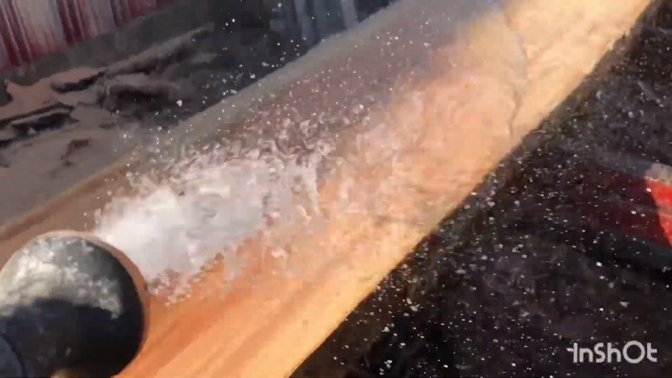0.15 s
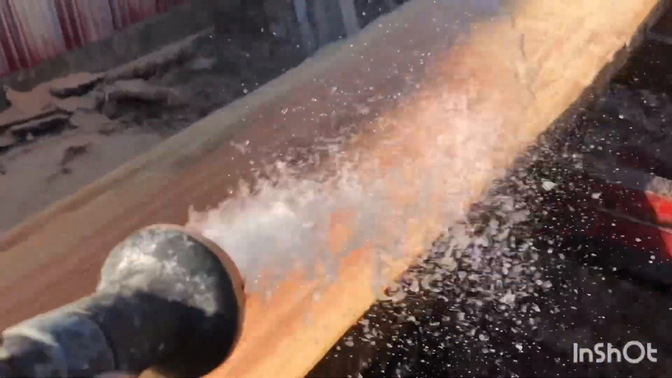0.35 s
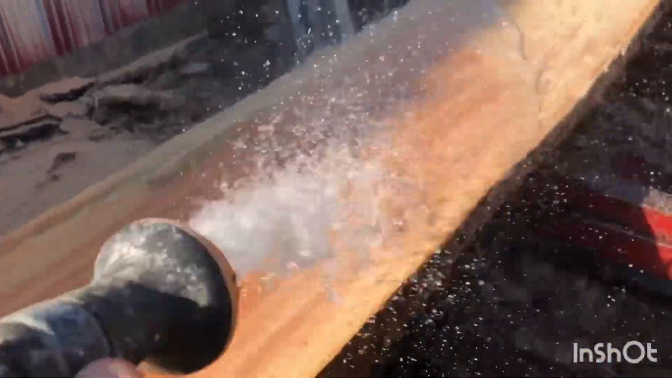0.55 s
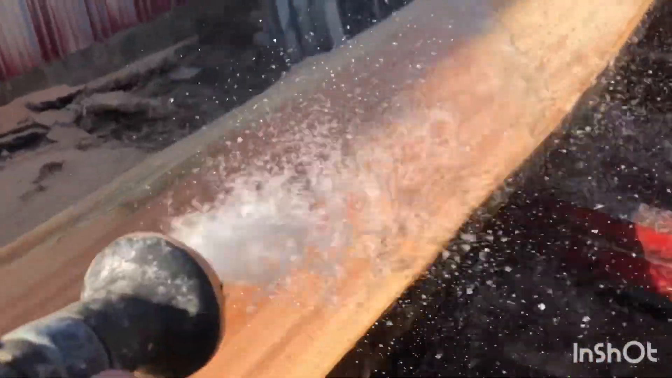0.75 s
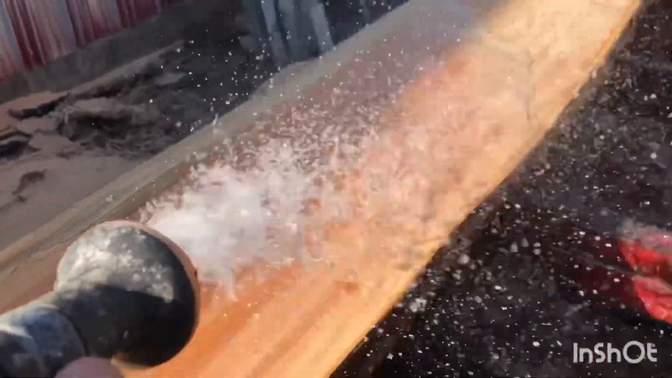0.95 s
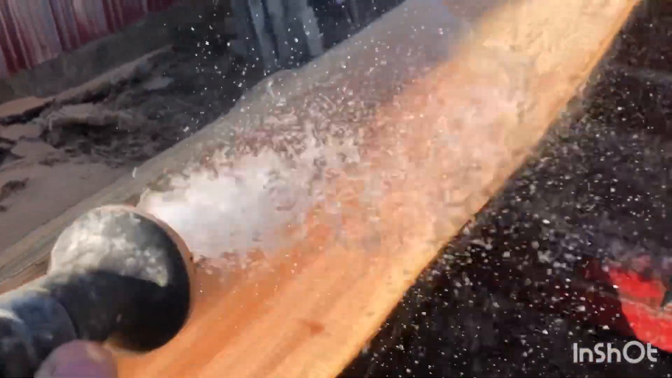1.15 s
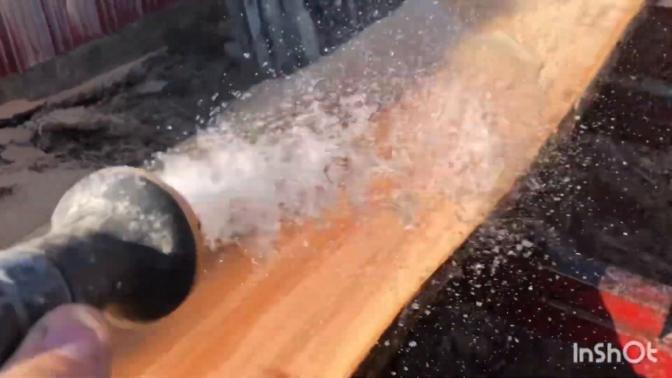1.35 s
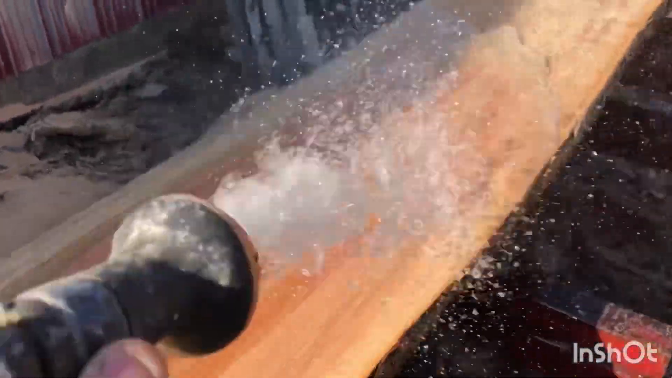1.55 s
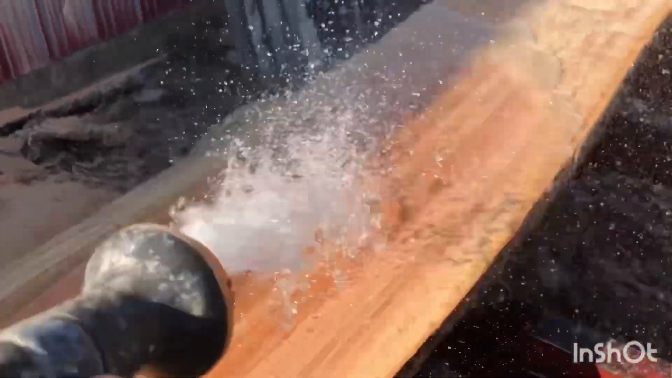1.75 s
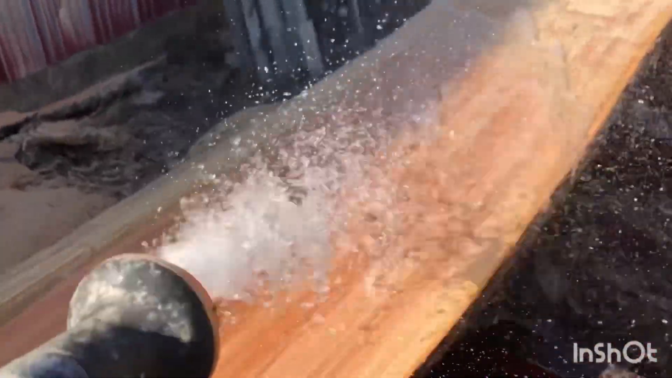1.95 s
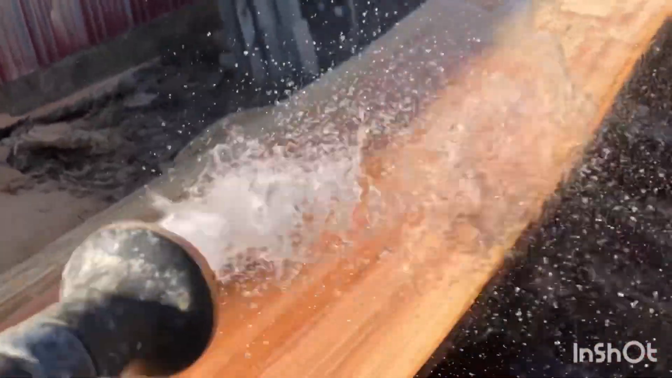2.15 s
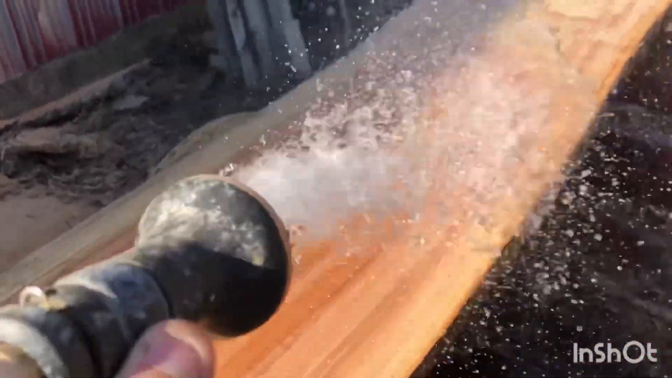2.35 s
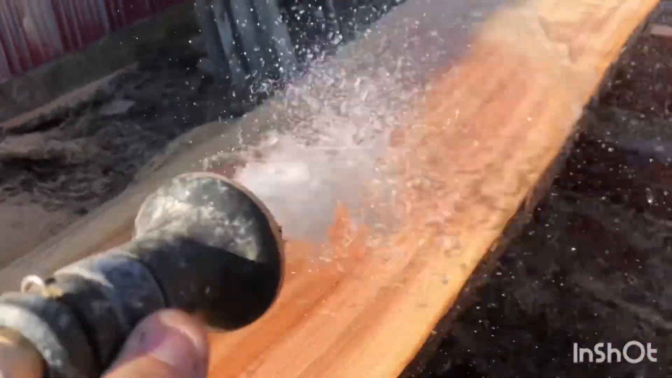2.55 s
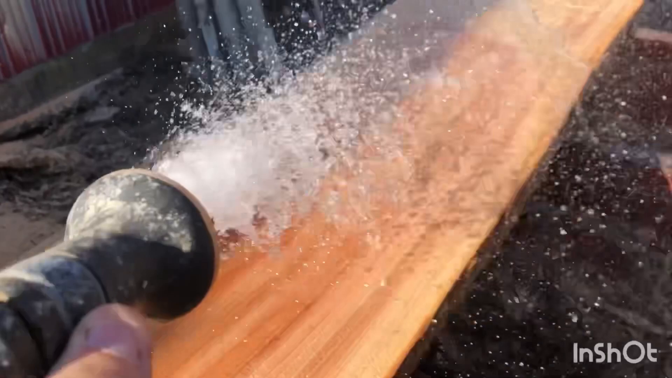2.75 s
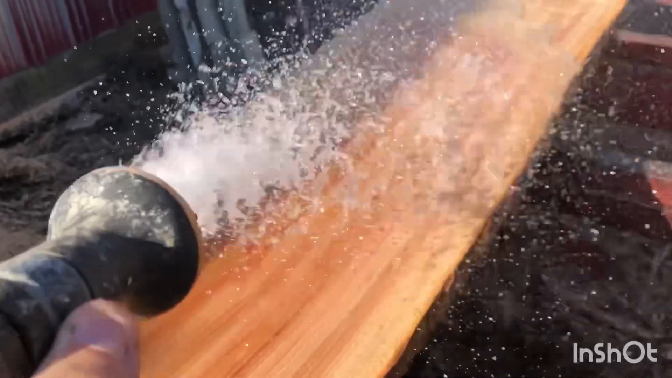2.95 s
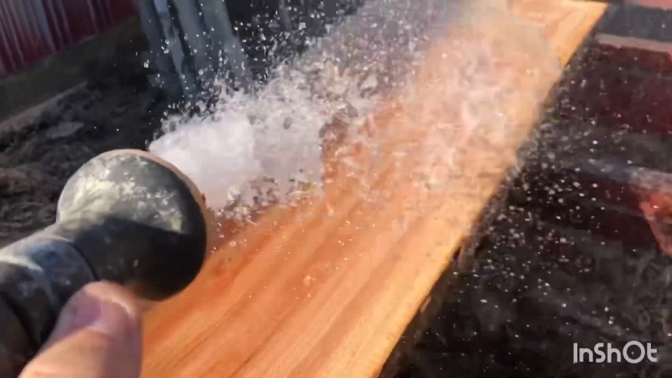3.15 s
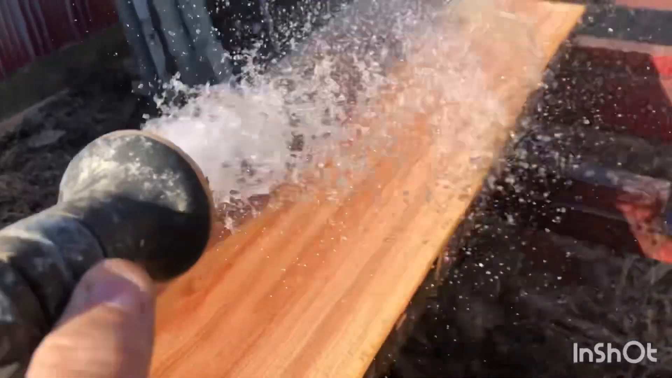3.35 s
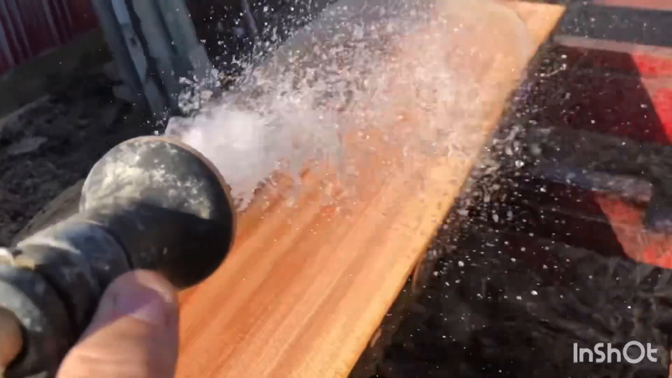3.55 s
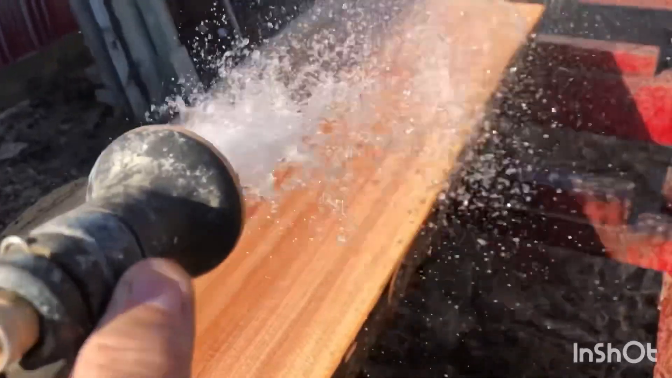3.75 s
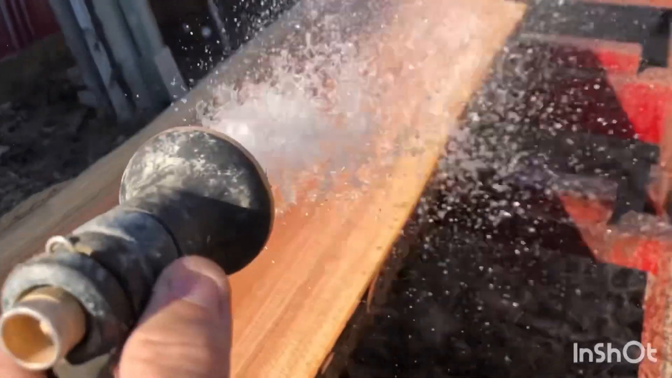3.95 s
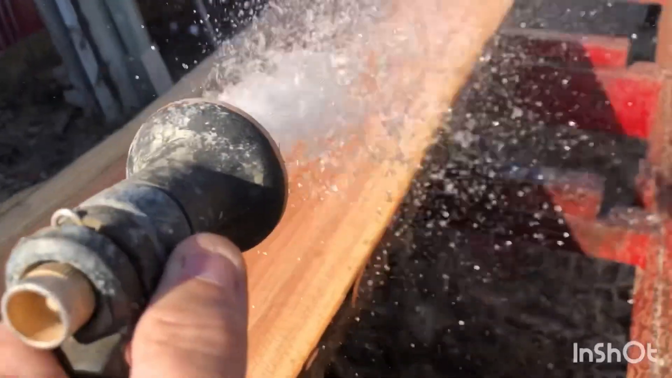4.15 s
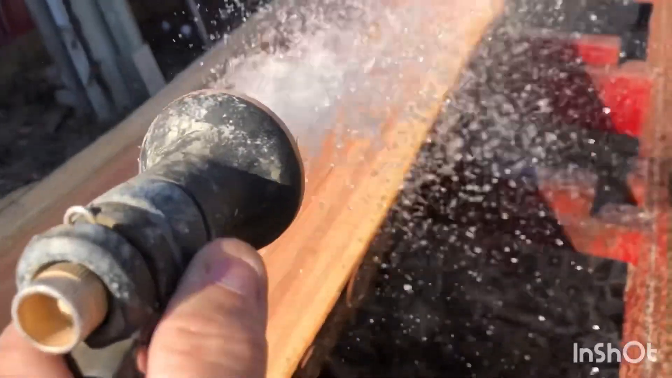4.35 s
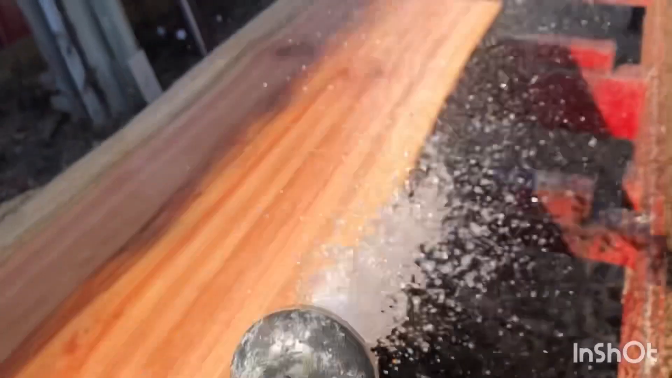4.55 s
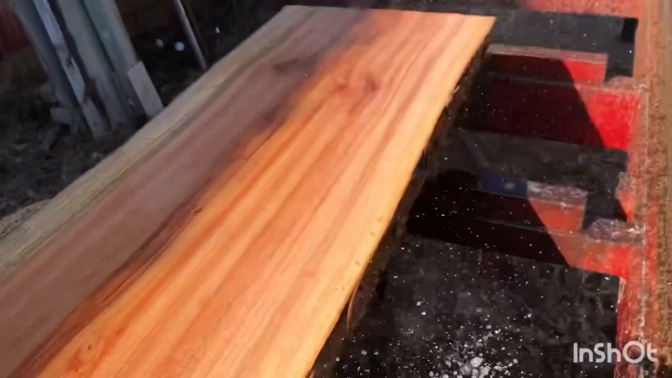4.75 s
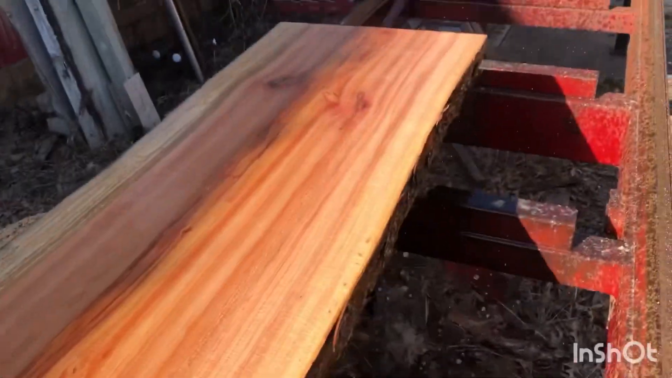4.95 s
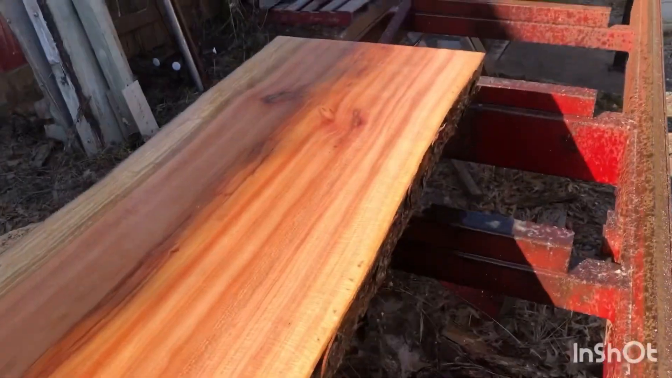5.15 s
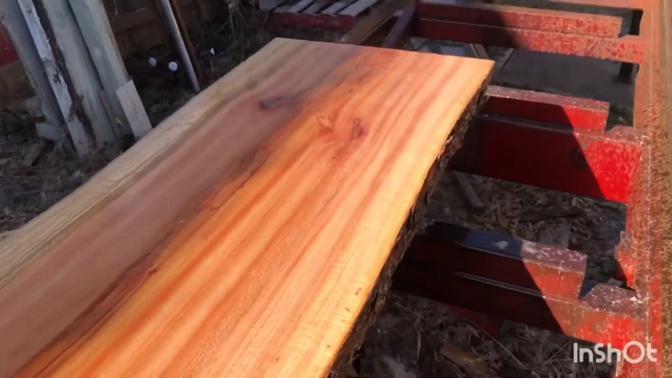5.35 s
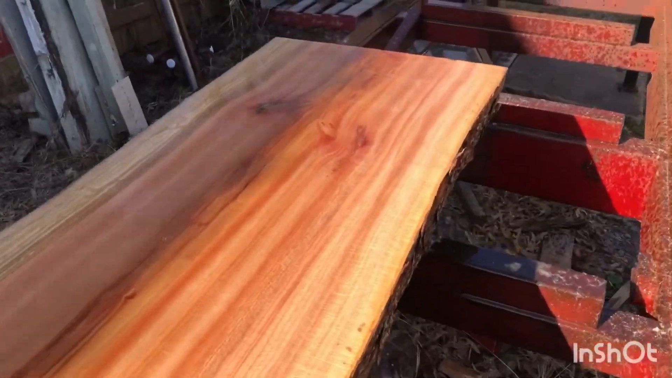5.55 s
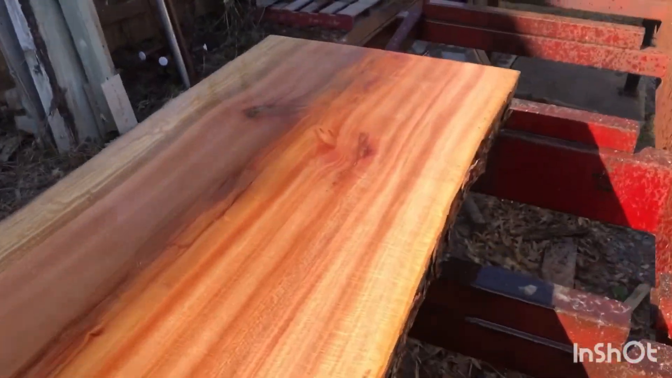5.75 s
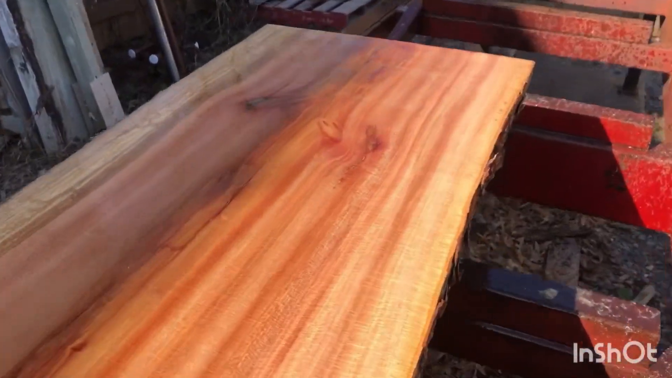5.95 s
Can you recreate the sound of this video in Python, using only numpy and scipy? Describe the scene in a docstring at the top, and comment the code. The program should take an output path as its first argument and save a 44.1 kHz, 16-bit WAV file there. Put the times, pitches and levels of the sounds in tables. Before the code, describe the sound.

From the start, a hose nozzle sprays water onto a wooden slab close by: a bright, steady hiss of droplets over uneven splatter, with a slight high ringing in the spray. Heavier blobs slap softly at about 1.6, 2.5, 3.3 and 4.4 to 4.7 seconds. The handheld nozzle gives dull little knocks around 2.9, 4.0, 4.4 and 4.7 seconds. From 4.4 seconds the valve closes and the hiss tightens and weakens, with two sharp drop clicks near 4.6. It shuts at 4.8 seconds with a tiny gulp of trapped air. A last patter falls around 5 seconds, then scattered drips and a fine crackle fade until about 6 seconds, with one faint knock near 5.7. Underneath throughout lie a quiet outdoor rumble and a distant machine hum, with a faint low throb after the spray stops.

```python
"""Water hisses and splatters as a hose nozzle sprays a wooden slab close by, then patters out and drips.
The hiss is thousands of droplets hitting the wood, and the rushing water makes the nozzle sing.
Blobs slap down and the nozzle knocks in the hand. Its valve closes with a squeeze of hiss and a gulp
of trapped air, and the last drops tick and crackle. A machine hums far off in the yard."""
import sys
import numpy as np
from scipy import signal
from scipy.fft import rfft, irfft, next_fast_len
from scipy.io import wavfile
from scipy.ndimage import map_coordinates

SR = 44100
rng = np.random.default_rng(int(sys.argv[2]) if len(sys.argv) > 2 else 0)


def inscribe(sig):
    """Save sig as 16-bit PCM at rate SR to the path in sys.argv[1].

    A 1-D sig is mono; a 2-D sig holds one channel per row.
    Samples are clipped to [-1, 1] before scaling.
    """
    pcm = np.round(np.clip(np.atleast_2d(sig).T, -1, 1) * 32767)
    wavfile.write(sys.argv[1], SR, pcm.astype(np.int16))


N = 268569

CLOSE_S, SHUT_S, SEAL_S = 4.38, 4.795, 0.01  # the valve starts closing, shuts, and takes this long to seal


def amp(db):
    """Turn decibels into a number to multiply a sound by."""
    return 10 ** (np.asarray(db) / 20)


def unit(x):
    """Scale a sound to an average strength (rms) of 1."""
    return x / np.sqrt(np.mean(x ** 2) + 1e-20)


def wobble(rate):
    """A smooth random curve that passes through rate random values a second."""
    return map_coordinates(rng.standard_normal(int(N * rate / SR) + 4), [np.arange(N) * rate / SR])


def filtered(x, response):
    """Multiply each frequency in x by response(frequency)."""
    size = next_fast_len(len(x) + 8192)
    return irfft(rfft(x, size) * response(np.fft.rfftfreq(size, 1 / SR)), size)[:len(x)]


def coloured(x, points, size=8192):
    """Shape the bass and treble of x along points of (frequency [Hz], level [dB])."""
    hz, db = np.transpose(points)
    grid = np.fft.rfftfreq(size, 1 / SR)
    gain = amp(np.interp(np.log(grid + 1), np.log(hz + 1), db))
    cepstrum = irfft(np.log(gain))
    cepstrum[1:size // 2] *= 2  # folded so that the filter rings only after a hit, never before
    cepstrum[size // 2 + 1:] = 0
    return signal.fftconvolve(x, irfft(np.exp(rfft(cepstrum))))[:len(x)]


def resonate(x, modes):
    """Make x ring at each (pitch [Hz], width [Hz], level [dB]); narrower rings longer."""
    return filtered(x, lambda f: sum(amp(db) * 1j * f * w / (hz * hz - f * f + 1j * f * w)
                                     for hz, w, db in modes))


def impacts(rate, spread_db):
    """About rate random hits a second, most small and a few large."""
    size = amp(spread_db * np.minimum(rng.standard_normal(N), 2.2))
    return unit((rng.random(N) < rate / SR) * size * rng.choice([-1, 1], N))


def pings(count, hz, octaves, cycles, spread_db):
    """Drops or bubbles at random times, each a fading ping of its own pitch and size."""
    start = rng.integers(0, N, count)[:, None]
    pitch, size = np.clip(rng.standard_normal((count, 2)), -2, 2).T[..., None]
    step = np.arange(256)
    turns = np.minimum(hz * 2 ** (octaves * pitch), SR / 3) * step / SR
    waves = amp(spread_db * size) * np.sin(2 * np.pi * turns) * np.exp(-turns / cycles)
    return unit(np.bincount((start + step).ravel(), waves.ravel(), N)[:N])


def drone(tones, waver_db, drift):
    """Low tones that waver in loudness and slightly in pitch."""
    t = np.arange(N) / SR
    return sum(amp(db + waver_db * wobble(7.6)) * np.sqrt(2)
               * np.sin(2 * np.pi * hz * t + drift * wobble(14)) for hz, db in tones)


def add(out, s, db, sound):
    """Mix a sound in at s seconds with its peak at db."""
    out[round(s * SR):][:len(sound)] += amp(db) * sound / np.abs(sound).max()


def flow_db():
    """How much water reaches the slab: steady, choked by the valve, a last slosh, then a dribble."""
    # water arriving, with 0 dB for the open jet: (time [s], flow [dB])
    flow = [(0, 0), (4.35, 0), (4.55, -1), (4.62, -1), (4.77, -12), (4.84, -12), (4.885, -18.5),
            (4.97, -15.5), (5.13, -35), (5.4, -44.5), (6.09, -50)]
    times, levels = np.transpose(flow)
    return np.interp(np.arange(N) / SR, times, levels)


def valve():
    """The squeeze on the valve (0 open, 1 closed) and whether water still passes (1 until it shuts)."""
    t = np.arange(N) / SR
    squeeze = np.clip((t - CLOSE_S) / (SHUT_S - CLOSE_S), 0, 1)
    passing = np.clip((SHUT_S + SEAL_S - t) / SEAL_S, 0, 1)
    return squeeze, passing


def slab_echo(x, gain_db, delay_ms, sway_ms):
    """The wet slab reflects the hiss; the delay sways with the hand, so the tone shifts."""
    lag = (delay_ms + sway_ms * wobble(2.5)) * SR / 1000
    return x + amp(gain_db) * map_coordinates(x, [np.arange(N) - lag])


def spray():
    """Droplets hit the slab in clumps over a smooth mist; the nozzle sings, then the valve hisses."""
    # tone of droplets hitting wood: (frequency [Hz], level [dB])
    hiss_shape = [(40, -63), (200, -27), (900, -16), (1850, -17), (2350, -16.5), (3350, -7.5), (4050, -6.5),
                  (5200, -4), (6200, -0.5), (6900, -2), (8300, 1), (9000, -0.5), (11700, -0.5), (15000, 0)]
    # peaks in the spray's tone, the nozzle's low ringing notes and high ripples from the slab's
    # reflection: (pitch [Hz], width [Hz], level [dB])
    spray_peaks = [(1040, 164, -8.5), (3617, 153, -1.5), (3766, 124, 2), (4400, 300, -3),
                   (6070, 336, -13.5), (7830, 260, -8.5), (9500, 530, -1.5), (10800, 450, -13),
                   (13370, 760, -6), (14900, 640, -15)]
    # where the slit of the nearly shut valve rings: (pitch [Hz], width [Hz], level [dB])
    slit_rings = [(2870, 680, 1.5), (4300, 570, 2.5), (5450, 390, -2), (10940, 580, 4.5), (12100, 420, 1),
                  (12670, 450, -9)]
    hiss_db, peaks_db, slit_db = -23, -30, -25.5
    peaks_fade_db, waver_ms = 39, 0.1186
    flow = flow_db()
    squeeze, passing = valve()
    clumps = amp(.8 * wobble(45) + 1.1 * wobble(350))
    droplets = unit(clumps * impacts(rate=6500, spread_db=4.5))
    # tiny bubbles in the film of water
    fizz = amp(-8.5) * pings(count=5000, hz=7990, octaves=0.5, cycles=5.4, spread_db=3.0)
    mist = amp(-1.5) * rng.standard_normal(N)
    hiss = coloured(droplets + fizz + mist, hiss_shape)
    hiss = amp(hiss_db) * unit(slab_echo(hiss, gain_db=-17, delay_ms=2.2, sway_ms=0.041))
    waver = np.arange(N) + waver_ms * wobble(30) * SR / 1000  # swirling water bends the pitch
    peaks = resonate(rng.standard_normal(N), spray_peaks)
    peaks = unit(map_coordinates(peaks, [waver], order=5))
    peaks *= amp(peaks_db - peaks_fade_db * squeeze + 0.49 * wobble(25.2))
    slit = unit(resonate(rng.standard_normal(N), slit_rings))
    slit *= amp(slit_db + 0.52 * flow) * squeeze ** 1.4 * passing
    return amp(0.18 * wobble(14)) * (amp(flow) * (hiss + peaks) + slit)


def splatter():
    """Heavier water churns on the slab in uneven bursts, and stands out more as the jet weakens."""
    # tone of the churning water: (frequency [Hz], level [dB])
    churn_shape = [(40, -55), (130, -11), (210, -6), (380, -8.5), (600, -5.5), (1050, -2), (1300, -1.5),
                   (1550, -1), (1870, -7), (2300, 3), (3100, -1), (5000, -9), (12000, -40.5)]
    level_db, squeeze_boost_db = -38, 9
    squeeze, passing = valve()
    bursts = amp(0.58 * wobble(21.91) + 1.5 * wobble(110))
    churn = unit(coloured(bursts * impacts(rate=2500, spread_db=3.5), churn_shape))
    return amp(level_db + 0.78 * flow_db() + squeeze_boost_db * squeeze ** 3 * passing) * churn


def runoff():
    """Fat drops fall off the slab's edge onto the ground; they outlast the jet."""
    drops = pings(count=3000, hz=7800, octaves=0.65, cycles=1.3, spread_db=6.5)
    patter = unit(coloured(drops, [(60, -65), (500, -13), (1900, -16.5), (3500, 0.5), (15000, -11.0)]))
    return amp(-38.5 + 0.67 * flow_db()) * patter


def yard():
    """Outdoor rumble and a far machine's hum; a low throb comes up as the recorder's gain rises."""
    # tone of the outdoor rumble: (frequency [Hz], level [dB])
    rumble_shape = [(22, -34), (38, -13.5), (62, 0.5), (100, -2.5), (170, -6.5), (250, -8.5), (330, -13.5),
                    (600, -15.5), (850, -17.5), (1250, -19), (1700, -22), (2800, -31.5), (7000, -39),
                    (15500, -52)]
    # the machine's hum: (pitch [Hz], level [dB])
    hum_tones = [(64.6, -66.5), (118.4, -56.5), (150.7, -80), (242.2, -60.5)]
    rise_start_s, rise_length_s, throb_hz = 4.95, 0.13, 61.4  # the rise comes after the spray stops
    rumble = unit(coloured(rng.standard_normal(N), rumble_shape))
    gain_rise = np.clip((np.arange(N) / SR - rise_start_s) / rise_length_s, 0, 1)
    throb = resonate(rng.standard_normal(N), [(throb_hz, 30, 0)])
    throb = unit(resonate(throb, [(throb_hz, 60, 0)]))
    hum = drone(hum_tones, waver_db=1.5, drift=0.37)
    return amp(-51) * rumble + amp(-2.5) * hum + amp(-52.5) * gain_rise * throb


def hose():
    """The hose drones as water runs through it, and fades as the flow drops."""
    # the hose's low notes: (pitch [Hz], level [dB])
    hose_tones = [(76, -10), (91, 2), (123, -6.5), (151, -8.5)]
    return amp(-54 + 0.36 * flow_db()) * unit(drone(hose_tones, waver_db=2, drift=1.24))


def slaps():
    """Thick blobs of water land as soft, wet bursts, all near one pitch."""
    # blobs landing: (time [s], level [dB])
    blobs = [(1.593, -23.5), (2.4658, -22), (2.581, -24.5), (3.269, -25), (3.3134, -28), (4.3584, -22.5),
             (4.556, -24.5), (4.5947, -30), (4.6895, -26), (4.7366, -24)]
    pitch_hz, scatter_octaves = 2480, .08
    out, t = np.zeros(N + SR), np.arange(SR // 12) / SR
    for s, db in blobs:
        hz = pitch_hz * 2 ** (scatter_octaves * rng.standard_normal())
        burst = rng.standard_normal(len(t)) * (1 - np.exp(-t / 0.0011)) * amp(-60 * t / 0.06)
        slap = resonate(burst, [(hz, .55 * hz, 0)])
        add(out, s, db + .5, resonate(slap, [(hz, hz, 0)]))
    return out[:N]


def knocks():
    """Short bumps ring the nozzle, dulled by the hand around it; a faint rub trails each one."""
    # bumps on the nozzle: (time [s], level [dB], rub compared with the bump [dB])
    bumps = [(2.856, -26.5, -3), (2.902, -29, -5), (2.96, -34, -5), (3.955, -29.5, -6), (4.405, -28.5, -9),
             (4.71, -26.5, -7), (5.6635, -32.5, -17)]
    # where the hand-held nozzle rings: (pitch [Hz], width [Hz], level [dB])
    grip_rings = [(291, 59, -2), (540, 250, 7.5), (880, 200, 14), (1616, 310, 0), (2330, 400, -16)]
    dull_shape = [(100, -9.0), (250, 3.5), (2500, 1), (3500, -16), (12000, -28.0)]
    out, t = np.zeros(N + SR), np.arange(SR // 6) / SR
    for s, db, rub_db in bumps:
        push = rng.standard_normal(len(t)) * (amp(-60 * t / 0.0092) + amp(rub_db - 60 * t / 0.13))
        add(out, s, db + 2.5, coloured(resonate(push, grip_rings), dull_shape))
    return out[:N]


def drips():
    """Each drop lands with a bright click, a tick around its own pitch and a short spatter."""
    # single drops: (time [s], level [dB], pitch [Hz], spatter compared with the tick [dB])
    drops = [(4.631, -8, 12300, -13), (4.645, -8, 12100, -13), (4.817, -16, 6920, -15),
             (4.8434, -19, 3500, -13), (4.9551, -17.5, 6060, -12), (4.9774, -22, 6630, -13),
             (5.028, -22.5, 6250, -13), (5.044, -24, 3610, -9), (5.0814, -26, 6870, -13),
             (5.096, -23.5, 6440, -7), (5.256, -34, 3790, -11), (5.3035, -38, 4890, -8),
             (5.3455, -27, 12100, -13), (5.3717, -31.5, 6460, -13), (5.4006, -35.5, 3740, -13),
             (5.523, -40, 6940, -11), (5.613, -32, 10200, -19), (5.7695, -36, 5880, -10),
             (5.7814, -45, 6800, -13), (5.908, -44.5, 5770, -13)]
    click_s, tick_s, spatter_s = .003, 0.0051, 0.066  # time each takes to fade by 60 dB
    bright_shape = [(500, -20), (2000, -10), (3500, -0.5), (15000, -1.5)]
    out, t = np.zeros(N + SR), np.arange(SR // 12) / SR
    for s, db, hz, spatter_db in drops:
        fade = amp(-60 * t / tick_s) + amp(spatter_db - 60 * t / spatter_s)
        tick = resonate(rng.standard_normal(len(t)) * fade, [(hz, 0.86 * hz, 0)])
        click = rng.standard_normal(len(t)) * amp(-12 - 60 * t / click_s)
        add(out, s + 0.0004, db - 0.5, coloured(tick + click, bright_shape))
    return out[:N]


def gulp():
    """As the valve shuts, air pockets ring roughly, rising in pitch as they shrink."""
    # air pockets: (time [s], pitch [Hz], level [dB], fade time [s], rise per fade time [octaves])
    pockets = [(4.787, 1097, -22, 0.00508, 0.13), (4.792, 2630, -22.5, 0.0035, 0.098)]
    t, out = np.arange(N) / SR, np.zeros(N)
    for s, hz, db, fade_s, rise in pockets:
        age = np.clip((t - s) / fade_s, -6, 6)
        phase = 2 * np.pi * np.cumsum(hz * 2 ** (rise * age)) / SR + 0.26 * wobble(870)
        out += amp(db) * np.exp(-age ** 2) * np.sin(phase)
    return out


def trickle():
    """Once the valve has shut, tiny drops crackle off the wet slab and slowly die away."""
    start_db, fade_db_per_s = -57, 8.5
    age = np.arange(N) / SR - SHUT_S
    ticks = coloured(impacts(rate=170, spread_db=8), [(300, -25), (2000, -10), (4000, -5), (15000, 0)])
    crackle = unit(ticks + amp(-1) * surroundings(ticks, fade_s=.03))
    return amp(start_db - fade_db_per_s * age) * (age > 0) * crackle


def surroundings(x, fade_s):
    """A brief echo off the sawmill frame and the ground, falling 60 dB in fade_s seconds."""
    t = np.arange(SR // 3) / SR
    tail = rng.standard_normal(len(t)) * amp(-60 * t / fade_s) * (t > .004)
    return signal.fftconvolve(x, tail / np.linalg.norm(tail))[:N]


def scene():
    """All the sounds reach one microphone, so both ears hear the same."""
    hits = drips() + slaps() + knocks() + gulp()
    water = spray() + splatter() + runoff() + trickle()
    mono = water + hits + amp(-15.0) * surroundings(hits, fade_s=0.13) + yard() + hose()
    return np.array([mono, mono])


def record(dry):
    """The very highest treble is cut away."""
    top_hz = 15900
    return np.array([filtered(x, lambda hz: hz < top_hz) for x in dry])


dry = scene()
out = record(dry)
inscribe(out)
```